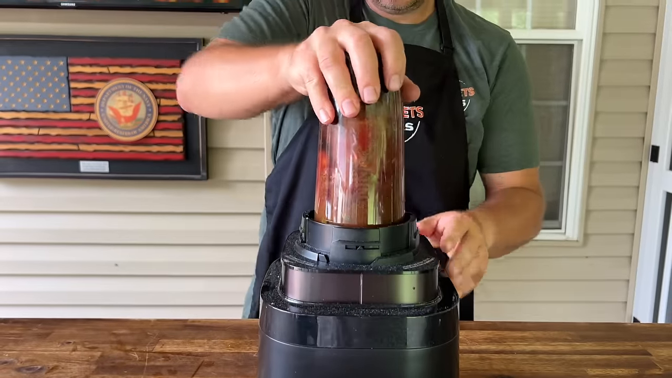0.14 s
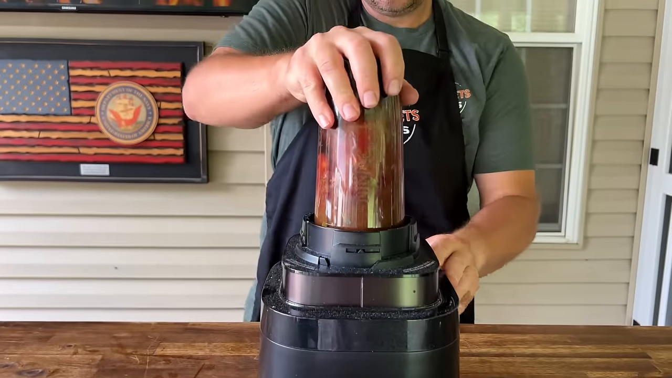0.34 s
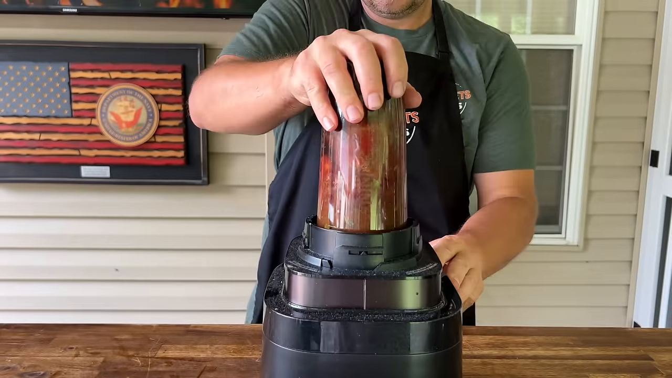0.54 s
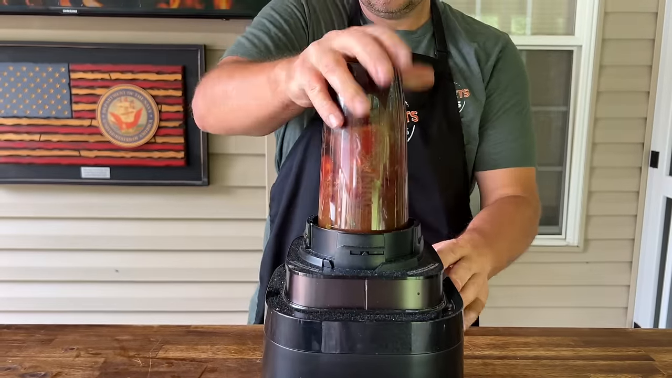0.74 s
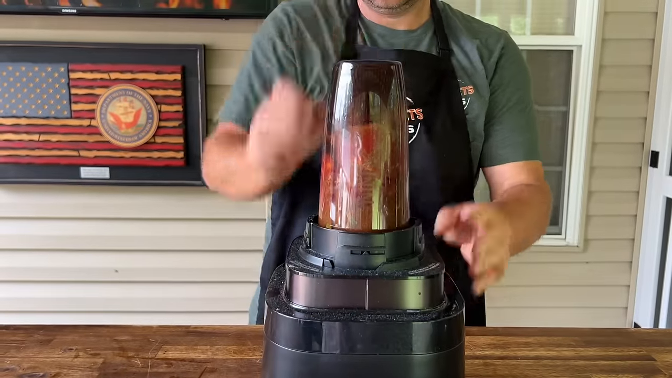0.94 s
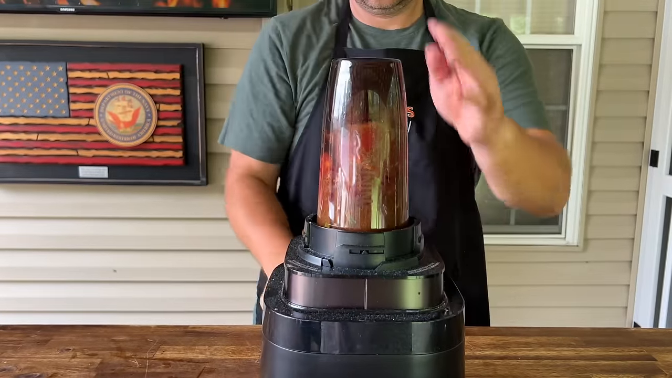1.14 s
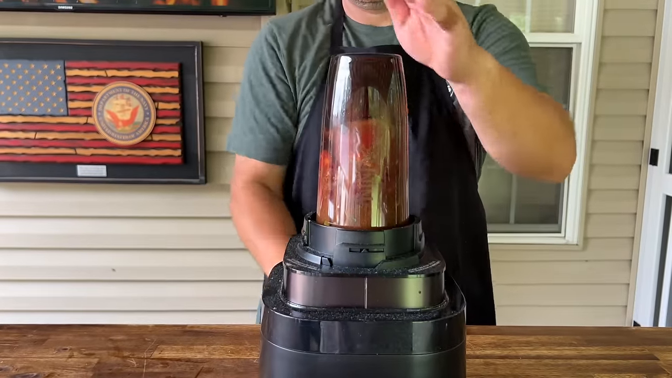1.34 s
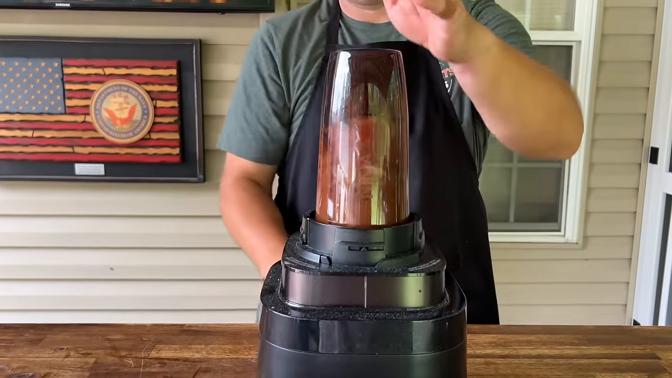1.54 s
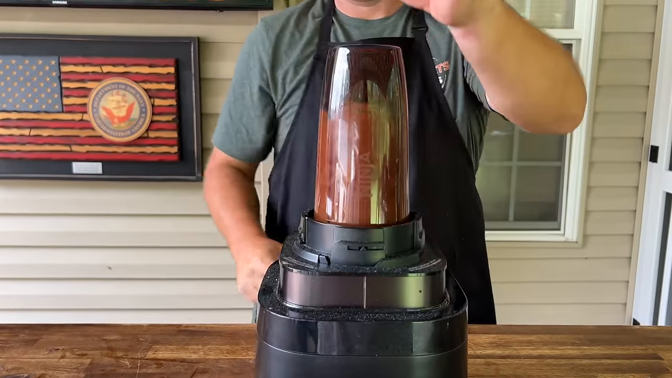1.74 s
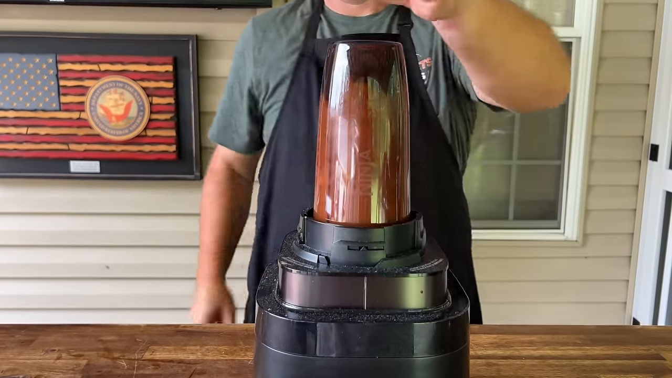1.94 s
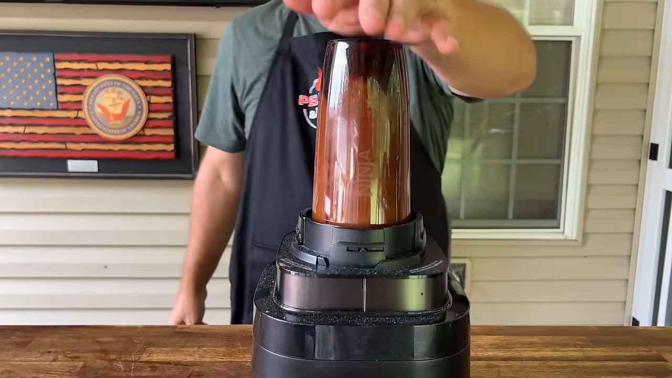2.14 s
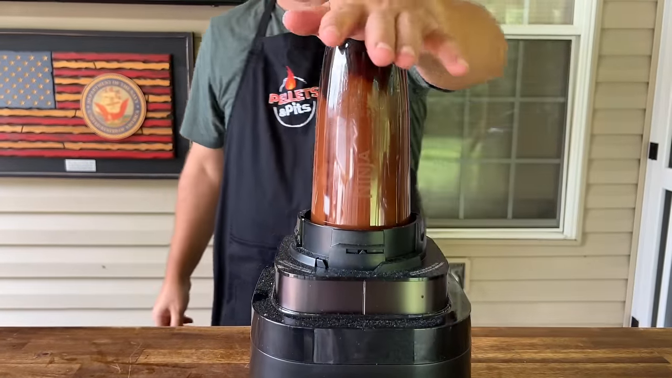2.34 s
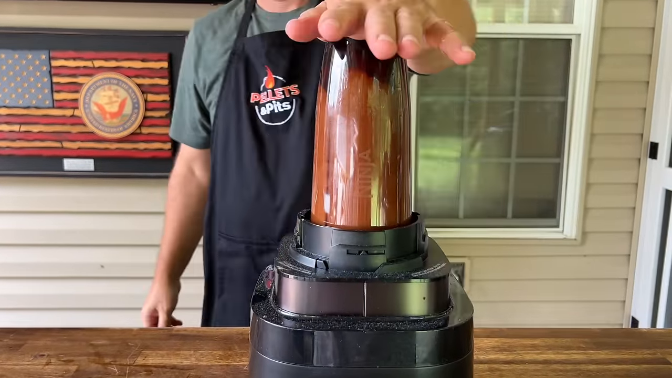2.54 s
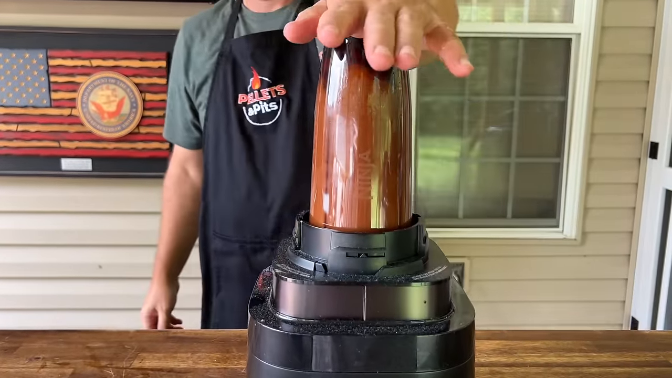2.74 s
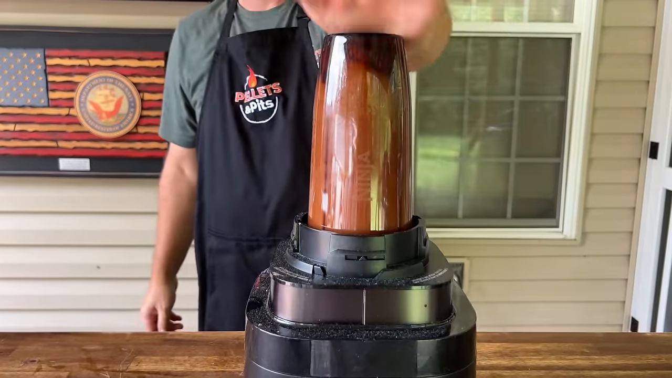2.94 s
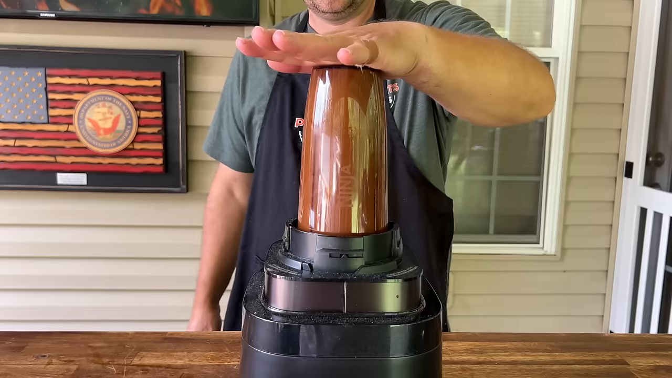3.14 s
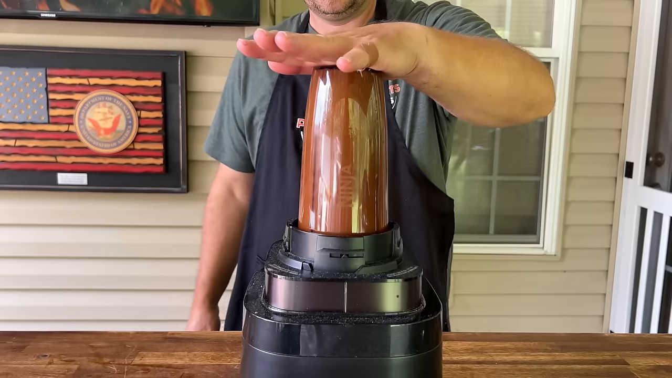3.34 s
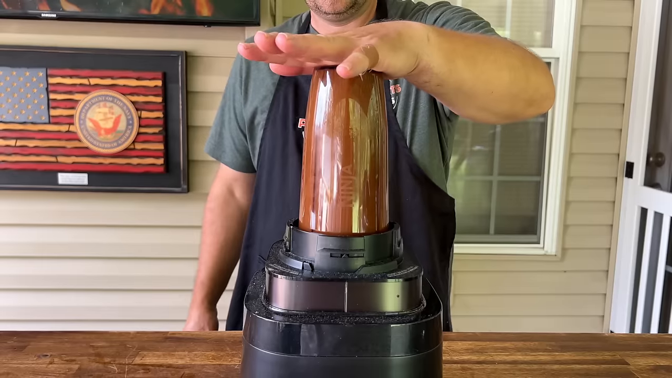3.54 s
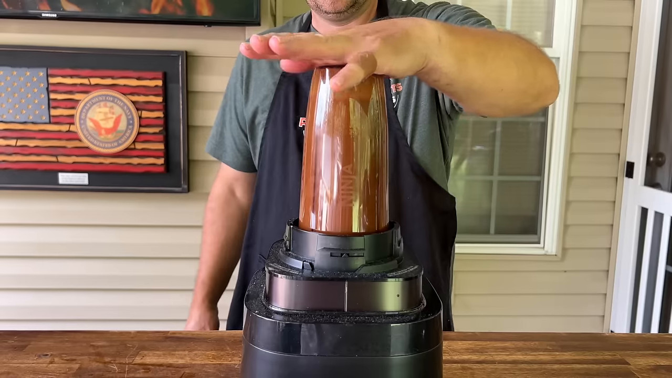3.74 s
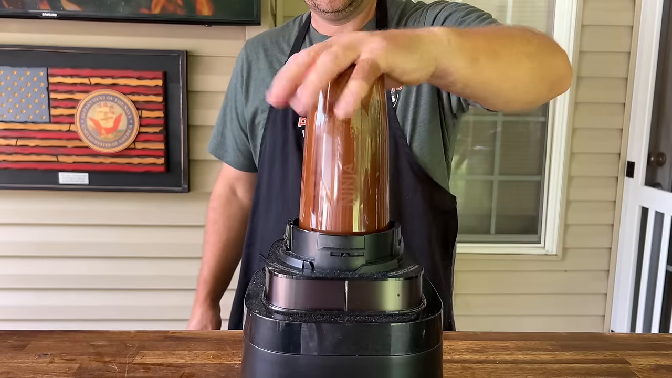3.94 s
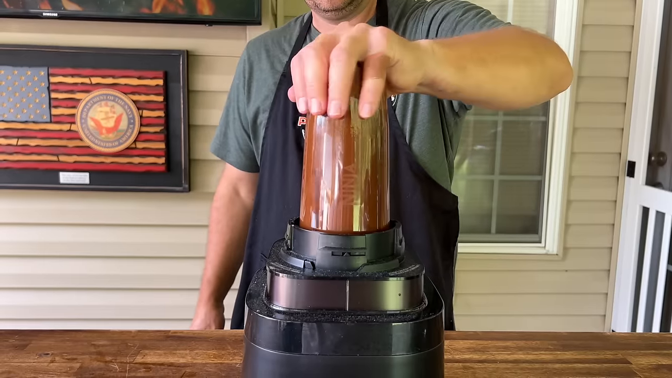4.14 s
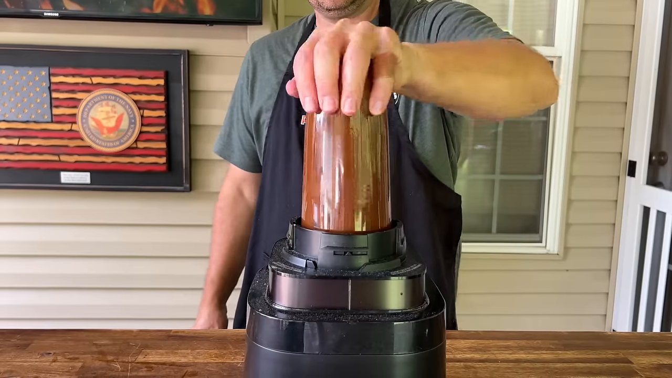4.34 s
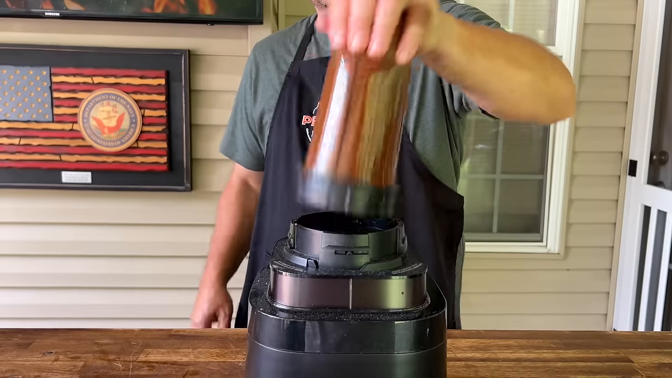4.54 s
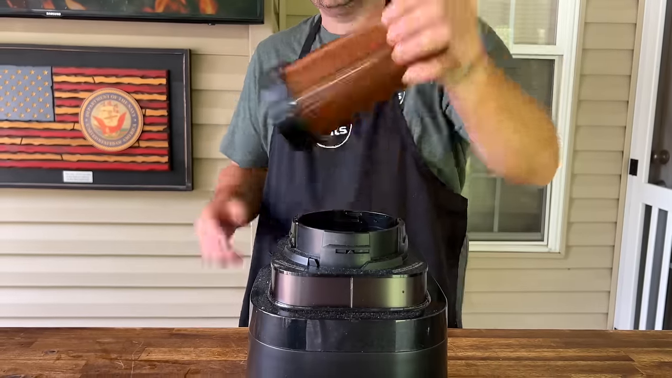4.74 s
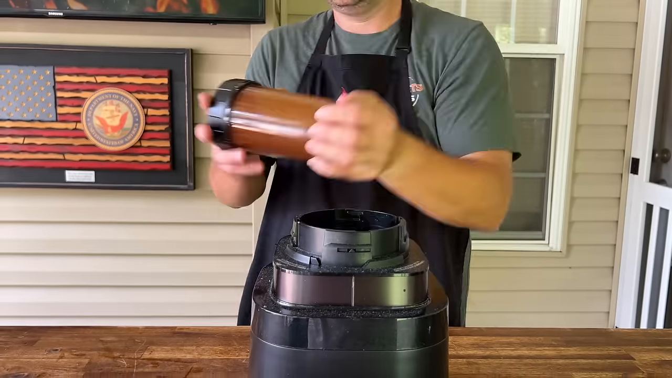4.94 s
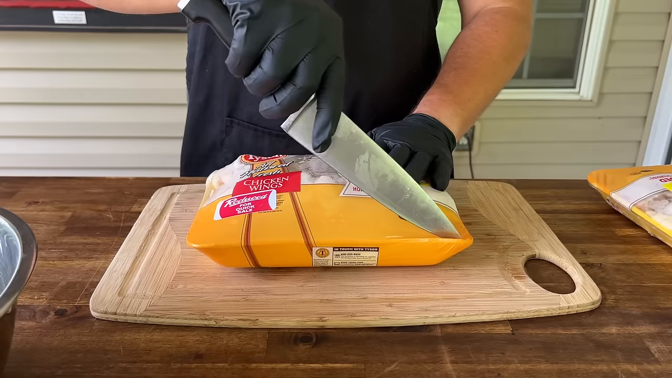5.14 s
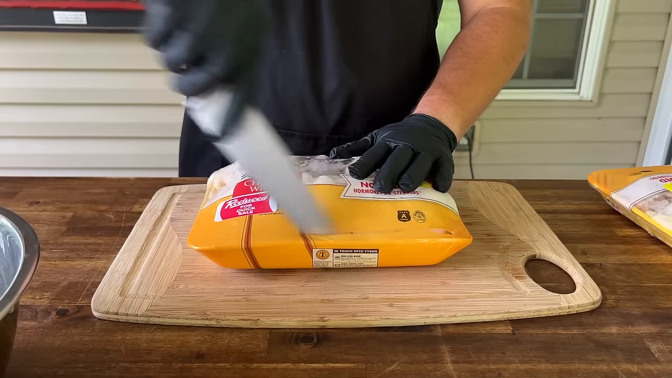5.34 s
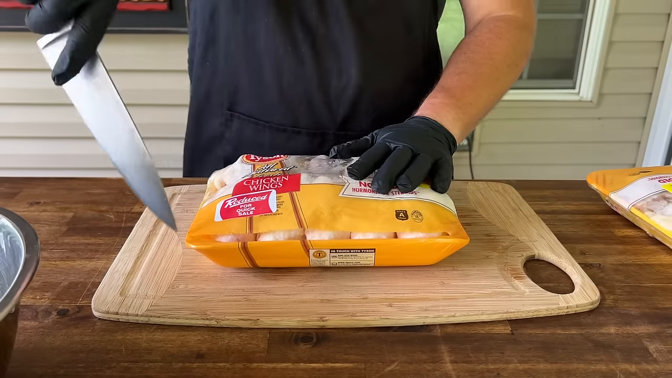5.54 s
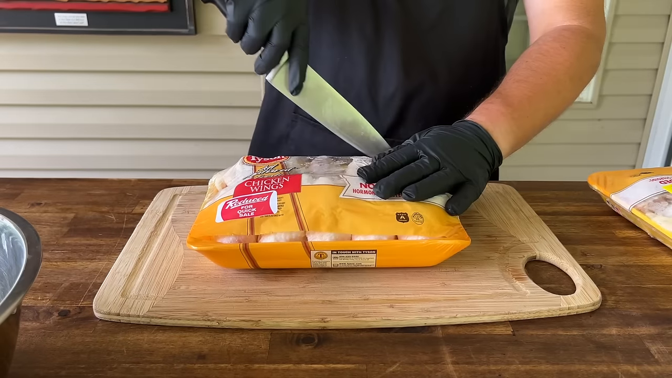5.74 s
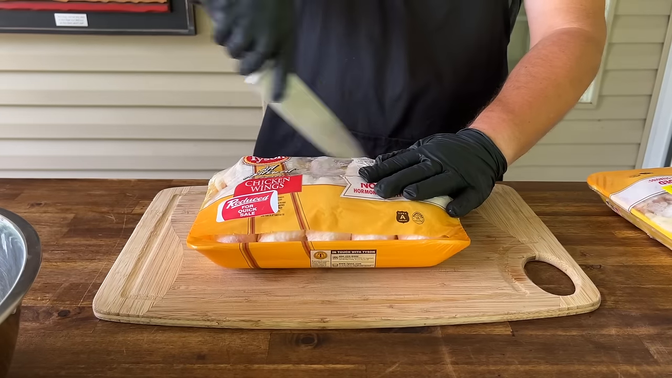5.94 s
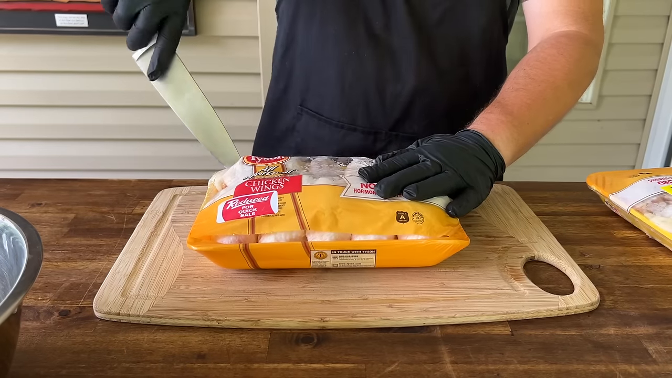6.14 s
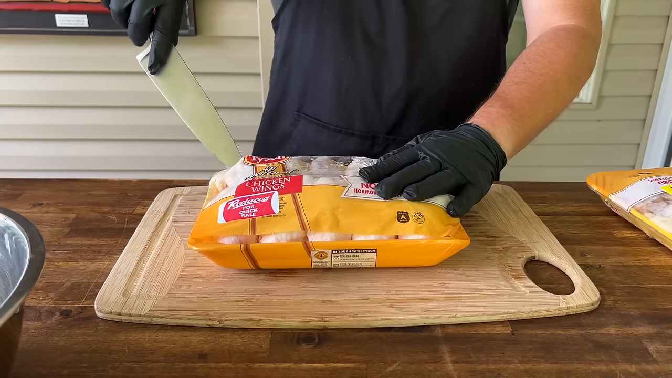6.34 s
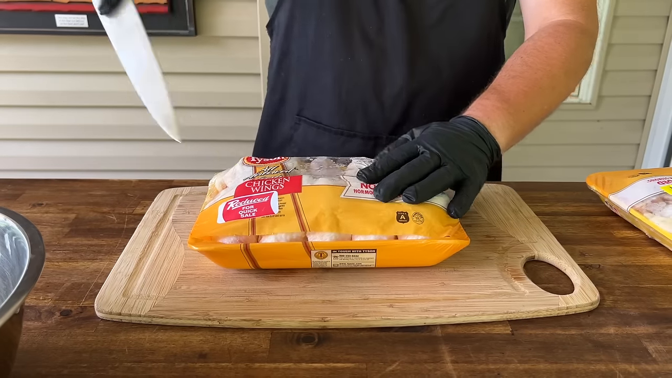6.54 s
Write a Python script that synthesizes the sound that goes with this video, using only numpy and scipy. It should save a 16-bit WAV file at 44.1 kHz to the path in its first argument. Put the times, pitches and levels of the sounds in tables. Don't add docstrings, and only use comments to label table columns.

```python
import sys
import numpy as np
from scipy import signal
from scipy.fft import rfft, irfft
from scipy.io import wavfile
from scipy.ndimage import uniform_filter1d

SR = 44100
rng = np.random.default_rng(int(sys.argv[2]) if len(sys.argv) > 2 else 0)


def int16_out(signal):
    q = np.round(np.clip(np.atleast_2d(signal).T, -1, 1) * 32767)
    wavfile.write(sys.argv[1], SR, q.astype(np.int16))


def natural_amplitude(level_db):
    exponent = np.asarray(level_db, float) / 20
    return 10 ** exponent


N = 291060
TIME = np.arange(N) / SR

# time_s, turns_hz
SHAFT_SPEED = [(1.39, 24.76), (1.7, 54.07), (2.17, 158), (2.25, 174), (2.31, 183.5), (2.37, 189.5),
               (2.43, 195.5), (2.49, 198.8), (2.56, 200.3), (2.67, 200), (2.79, 198.3), (2.9, 197.2),
               (3.078, 195)]
# time_s, drone_db
SAUCE_LOAD = [(1.39, -72), (1.398, -38.5), (1.46, -37), (1.6, -39.5), (1.774, -27), (2.042, -21.5),
              (2.4, -16), (2.836, -15), (3.078, -15.5)]
START_S, CUT_S, STOP_S = 1.39, 3.078, 3.95
COAST_HZ, COAST_TAU_S, FRICTION_HZ = 141.2, 0.58, 25.93
COAST_DB, COAST_DB_PER_OCTAVE, FULL_DB = -28, 12, -15
STALL_HZ, STALL_DB_PER_OCTAVE = 42.7, 1.5
# level_db above the loudest drone, slope in dB per dB of drone
DRONE_LAYERS = [
    [(2, 0.27), (-11.5, -0.32), (-17, -1.08), (-12.5, 0.3), (-18, 1.3), (-20.5, -1)],
    [(-1.5, 0), (-3, -0.26), (-10.5, -1.28), (-20, 0), (-19, 6), (-9.5, -0.4)],
]
# frequency_hz, density_db
ROAR_SPECTRUM = [(90, -14.5), (140, -13), (200, -10.5), (320, -8.5), (500, -5), (700, -7.5), (1260, -5.5),
                 (1520, -13), (2090, -9.5), (2750, -15.5), (3400, -7), (5600, -22.5), (8600, -26.5),
                 (9600, -31), (15700, -35.5)]
# frequency_hz, width_hz, gain_db
HOUSING_MODES = [(548, 34, 3), (654, 55, 5.5), (786, 90, 6), (1190, 120, -1.5), (1790, 39, 8.5),
                 (2120, 120, 2), (2373, 59, 5), (3470, 310, -9), (4300, 250, -1), (5450, 200, 3),
                 (7900, 1000, 3)]
# multiple, peak_db, peak_s, sag_db half a second away, start_s
SHAFT_HUM = [
    (1, -18, 2.64, -9.5, 2.2),
    (2, -23, 2.8, -4, 2.42),
    (3, -22.5, 2.76, -9, 2.43),
]
HUM_RISE_S, HUM_SLIP_S, HUM_SLIP_DB = .05, 2.91, -3
TOP_FROM_S, TOP_DB = 1.72, -50.5
# frequency_hz, width_hz, gain_db
COUPLING_MODES = [
    [(2060, 290, 5), (3400, 500, 9), (4660, 450, 11), (4100, 600, 6), (7900, 500, 6), (8750, 300, 7)],
    [(1900, 500, 11.5), (3420, 400, 22), (4640, 450, 14), (7900, 500, 10), (4200, 500, 5), (8700, 300, 16)],
    [(1900, 600, 13.5), (3400, 560, 18), (2700, 500, 6), (4100, 500, 6), (4680, 350, 13.5), (5450, 300, 6),
     (8000, 900, 5.5)],
]
# frequency_hz, width_hz, gain_db
CUP_MODES = [
    [(248, 70, 19), (702, 380, 12)],
    [(257, 110, 16.5), (699, 150, 8.5), (1000, 360, 14)],
    [(257, 110, 16.5), (770, 150, 8.5), (1180, 280, 17)],
]
KNOCKING_HZ = 55
SEATED_S, SEATING_S = 1.83, .08
SETTLED_S, SETTLING_S = 3.37, .3
LOOSE_HZ, LOOSE_OCTAVES, LOOSE_DB = 130, 0.37, 5.5
FREE_HZ, FREE_DB_PER_OCTAVE = 62.6, 15
# start_s, peak_db, ring_hz
SHAFT_KNOCKS = [(1.3963, -32, 2080), (1.4163, -25, 2060), (1.4412, -30, 3320), (1.4602, -24, 2010),
                (1.487, -31, 4100), (1.5644, -34, 2310), (1.519, -34, 3200), (1.545, -38, 4200),
                (1.5789, -31, 4350), (1.6038, -33, 4500), (1.6457, -27, 2050), (1.6682, -27, 2440),
                (1.818, -22, 3300), (1.903, -23, 3400), (3.5032, -34, 3440), (3.527, -36, 3400),
                (3.5677, -40, 3150), (3.607, -39, 4600), (3.6306, -39, 3210), (3.652, -41, 3030),
                (3.6785, -40, 3290), (3.7114, -44, 3210), (3.7393, -40.5, 3180), (3.7767, -47, 3230),
                (3.8241, -43, 3520), (3.8855, -54, 2770), (3.9089, -52, 2500)]
# start_s, peak_db, pitch_hz, decay_cycles
PART_RINGS = [
    [(.0575, -9.5, 4460, 7.2), (.0605, -11.5, 313, 4.5), (.84, -57, 2030, 80), (1.2138, -32, 1570, 9.8),
     (1.214, -30, 807, 6), (1.2045, -47, 11000, 2.5), (4.0765, -44.5, 4700, 12), (4.1235, -21, 4340, 8),
     (4.078, -37, 500, 4.4), (4.1098, -18.5, 1580, 10), (4.1098, -23, 2150, 12), (4.1092, -19, 570, 4),
     (4.445, -45, 2600, 6), (4.472, -46, 3000, 6)],
    [(1.4103, -42, 7000, 4), (1.4337, -40, 6500, 4), (1.4602, -40, 12000, 3), (1.468, -41, 11000, 3),
     (1.503, -44, 12900, 3), (1.541, -42, 12500, 3), (1.617, -44, 12000, 3), (1.643, -42, 12000, 3),
     (1.545, -47, 8750, 26), (1.5809, -43, 8700, 40), (1.58, -27, 4600, 20), (1.6018, -41, 8780, 30),
     (1.6263, -40, 5400, 8), (1.6672, -34, 6000, 4), (1.6931, -34, 5220, 8)],
    [(3.4103, -31, 1010, 5), (3.4397, -23, 1090, 5.7), (3.4752, -36, 1160, 5), (3.4886, -25, 1020, 5.9),
     (3.5126, -38, 1230, 5), (3.537, -35, 1150, 5), (3.561, -31, 1180, 8), (3.6074, -34, 1140, 6),
     (3.6453, -32, 1210, 4.7), (3.6757, -42, 1050, 5), (3.7396, -47, 1020, 5)],
]

# start_s, crack_db, body_db, sizzle_db, body_pitch_hz
CUP_KNOCKS = [(0.0064, -20, -27.5, -22.5, 375), (0.016, -40, -34, -27.5, 257),
              (0.0574, -14.5, -14, -11.5, 349), (0.398, -30, -53, -56, 186), (0.597, -31, -42, -71, 216),
              (1.2117, -23.5, -26, -50, 206), (1.3183, -27.5, -29.5, -66, 200), (1.374, -33, -40, -43, 208),
              (1.393, -37, -30, -65, 242), (4.1103, -16, -33, -10.5, 355), (4.1239, -27, -30, -26, 356),
              (4.1278, -30, -32, -24.5, 347), (4.1696, -19.5, -24.5, -46, 335), (4.179, -26, -32, -47, 379),
              (4.1876, -43, -36, -51, 334), (4.198, -48, -46, -56, 298), (4.4161, -43.5, -40, -59, 246),
              (4.4452, -50, -51, -57, 292), (4.466, -44, -57, -44.5, 204)]
# multiple of body pitch, level_db, t60_s
BODY_MODES = [(0.682, -6, 0.092), (1.0, 4, 0.05), (1.548, -3, 0.052), (2.2, -5.5, 0.048),
              (2.898, -11, 0.059)]
# frequency_hz, level_db, t60_s
SHELL_MODES = [(1210, 3, 0.077), (1576, 6, 0.0425), (2157, -2, 0.047), (2840, 0, 0.062), (3080, -21, 0.016),
               (4300, -1.5, .04), (4350, -4, 0.04)]
KNOCK_T60_S = 0.045

# start_s, length_s, level_db, brightness_db, growth_db
TEAR_RUNS = [
    [(4.075, 0.013, -51, -7.5, -11.5), (4.131, 0.04, -46.5, -5, -5.5), (4.204, .05, -58, -9, 0),
     (4.414, 0.025, -56, -3.5, -10), (4.438, .04, -54, -3, 2)],
    [(5.229, .012, -38, 1, -5), (5.239, 0.018, -26.5, 4, 3), (5.262, 0.043, -42.5, 1.5, 6.5),
     (5.297, 0.016, -25, 0, -5), (5.32, 0.012, -31.5, 2.5, -11), (5.331, 0.035, -23, 0, -0.5),
     (5.367, 0.024, -31, 1, -8.5), (5.391, 0.0062, -20.5, 2.5, -2), (5.397, 0.045, -40, 5.5, -6),
     (5.44, 0.047, -46, 10, -9)],
    [(5.8985, 0.021, -31, 3, -6.5), (5.921, 0.017, -36.5, 5, -4), (5.94, .03, -36, 6.5, -1),
     (5.97, 0.033, -36, 10, -2.5), (6.0, .024, -35, 2.5, -1), (6.024, 0.0255, -36, 5, -9.5)],
    [(6.05, 0.074, -49, 5, -15), (6.217, 0.072, -52.5, 12, -19)],
    [(5.198, 0.045, -43.5, -5.5, -2), (6.326, 0.039, -53, 5.5, -2), (6.366, .04, -54.5, 7, -13)],
]
# boom_db, rise_s, blade_edge_db, crackle_db, taut_film_db, release_s
TEAR_COLOURS = [
    (4, 0.00464, -28, -1.5, -39, .002),
    (-11, 0.0077, -29, -2.5, -13.5, .0014),
    (-24, 0.0036, -26, -7, -4, .004),
    (-30, .003, -7, -1, -30, .004),
    (-30, 0.021, -1.5, -0.5, -31, .012),
]
# start_s, peak_db, centre_hz, sizzle_db, decay_cycles
FILM_SNAPS = [(5.228, 5, 4430, -3, 2.4), (5.2382, -14, 5460, -17, 2.9), (5.3163, -10, 3500, -20, 1.4),
              (5.3163, -12, 1000, -40, 1), (5.3445, -21, 1000, -30, 0.91), (5.3485, -17, 1200, -29, 0.87),
              (5.354, -14, 2500, -25, 1.5), (5.3615, -12.5, 900, -25, 1), (5.899, -18, 2500, -30, 1.5),
              (5.8877, -2, 2520, -20.5, 2.5), (5.8911, -3.5, 2700, -16, 1.5),
              (6.0438, -20, 4040, -18.5, 1.5), (6.15, -38, 4000, -36, 2.5), (6.1852, -46, 4000, -46, 3.0),
              (6.2153, -17, 3980, -9, 2.7), (5.2285, -19, 354, -58.5, 1.5), (5.888, -23.5, 670, -59, 2.7),
              (6.2156, -32, 1650, -59, 4.8), (6.2158, -33, 4000, -60, 12), (.295, -70, 9000, -53, 1.6),
              (4.92, -71, 9000, -51.5, 1.4), (3.9092, -70, 8000, -48, 1.5), (5.3, -19, 3000, -24.5, 2.2),
              (6.5403, -71, 8000, -52, 1.5), (6.5736, -53.5, 3000, -48, 2.5)]
# frequency_hz, density_db
FILM_SPECTRUM = [(180, -44.5), (300, -7), (366, -3.5), (756, -9), (863, -6.5), (1000, -10), (1810, -2.5),
                 (1970, -5), (2610, -4.5), (3870, -3.5), (7250, -16), (8140, -13.5), (15500, -19.5)]
# frequency_hz, width_hz, level_db, drift_db_per_s
SLIT_RINGS = [(1590, 320, -2, 38), (2105, 500, -5, -70), (3000, 500, -8, 0), (3720, 450, -4.5, 40),
              (4600, 450, -7.5, -0.5), (6000, 600, -15, 1)]
SLIT_MID_S = 5.97

PORCH_T60_S, PORCH_DB, FILM_PORCH_DB = 0.18, -15, -16.5

# peak_s, half_width_s, flutter_db, buffet_db
WIND_GUSTS = [(.06, 0.044, -24.5, -19), (.33, 0.037, -50, -18), (.5, 0.043, -20, -1.5),
              (.61, 0.04, -13, -7), (.81, 0.071, -30.5, -11.5), (1.03, 0.054, -16, -47),
              (1.17, 0.022, -11, -4), (1.29, 0.033, -10.5, -1), (1.45, 0.091, -30, -3),
              (1.6, 0.2, -18, -11.5), (1.92, 0.075, -14.5, -11), (2.44, 0.088, -22, -11),
              (2.7, 0.099, -26, -7), (3.02, 0.13, -25, -11.5), (3.14, 0.061, -25, -21),
              (3.4, 0.078, -45, -11), (3.72, 0.1, -30, -17), (3.92, 0.06, -26, -12),
              (4.36, 0.041, -30, -14), (4.6, 0.1, -27, -10.5), (4.74, 0.089, -21.5, -18),
              (4.91, 0.091, -25, -25), (5.26, 0.055, -27.5, -26.5), (5.42, 0.037, -29, -12.5),
              (5.62, 0.064, -18.5, -15), (5.73, 0.037, -16, -6.5), (6.18, 0.051, -25, -15),
              (6.37, 0.14, -25, -18.5), (6.6, 0.034, -23.5, -26)]
# frequency_hz, density_db
BUFFET_SPECTRUM = [(1.5, 17.5), (4, 11), (9, 21.5), (15, 14.5), (22, 11), (40, -67)]
# frequency_hz, density_db
FLUTTER_SPECTRUM = [(12, -10), (22, -4.5), (35, -7.5), (60, -14.5), (110, -29), (200, -46), (400, -93.5)]
# start_s, step as a fraction of full scale
PRESSURE_STEPS = [
    (5.0137, -0.061),
    (5.7807, -.22),
]
CALM_FLUTTER_DB, CALM_BUFFET_DB, WIND_TOP_HZ, GRILLE_LIMIT = -36, -22, 4970, .72

# frequency_hz, density_db
YARD_SPECTRUM = [(130, -3), (230, 0), (330, -4), (500, -8.5), (820, -8.5), (1100, -14.5), (2060, -19.5),
                 (2900, -23), (5300, -27.5), (6300, -37.5), (7500, -21.5), (8400, -40), (15500, -63)]
# peak_s, half_width_s, low_chorus_db, high_chorus_db
INSECT_SWELLS = [(.15, 0.12, -58.5, -51.5), (.95, 0.28, -60, -50.5), (4.64, 0.13, -63.5, -53.5),
                 (5.1, .1, -63, -52), (5.5, 0.086, -57, -69.5), (5.92, 0.13, -57, -57),
                 (6.6, 0.17, -68, -54)]
CHORUS_LOW_DB, CHORUS_HIGH_DB = -70, -68.5
YARD_DB, DIP_START_S, DIP_END_S, DIP_DB = -52, 4.52, 5.01, -1.5
SELF_NOISE_DB = -74.5


def blender():
    hz = speed()
    turn = 2 * np.pi * np.cumsum(hz * (1 + 0.0005 * walk(30))) / SR
    lumps = natural_amplitude(1.5 * np.clip((1.9 - TIME) / .5, 0, 1) * walk(60))
    pulse = (1 + 0.091 * np.cos(turn)) * lumps
    bands_hz = ((0, 1400), (1400, 5600), (5600, 9000), (9000, 3e4))
    cup, blade, air, top = (hiss(ROAR_SPECTRUM, lo, hi, HOUSING_MODES) for lo, hi in bands_hz)
    rumble = hiss([(120, -6), (240, 0.5), (340, -5.5)], 120, 340)
    rattles, bells = chatter(hz)
    out = shaft_hum(turn) + pings(PART_RINGS[1] + PART_RINGS[2]) + shaft_knocks(rattles)

    loose = natural_amplitude(LOOSE_DB * (TIME < CUT_S) * np.exp(-(np.log2(hz / LOOSE_HZ) / LOOSE_OCTAVES) ** 2))
    loose = loose * natural_amplitude(FREE_DB_PER_OCTAVE * (TIME > CUT_S) * np.log2(np.minimum(hz / FREE_HZ, 1)))
    driven_db = np.interp(TIME, *np.transpose(SAUCE_LOAD))
    coast_db = COAST_DB + COAST_DB_PER_OCTAVE * np.log2(hz / COAST_HZ)
    coast_db = coast_db + STALL_DB_PER_OCTAVE * np.log2(np.minimum(hz / STALL_HZ, 1))
    driven = driven_db, FULL_DB, (TIME > START_S) & (TIME < CUT_S)
    coasting = coast_db, COAST_DB, (TIME >= CUT_S) & (TIME < STOP_S)
    top_on = np.clip((TIME - TOP_FROM_S) / 0.024, 0, 1) * (TIME < CUT_S)
    for (drone_db, loudest_db, on), layers, bell, rattle in zip((driven, coasting), DRONE_LAYERS, bells, rattles):
        gains = [natural_amplitude(np.minimum(db + slope * (drone_db - loudest_db), 3.5)) for db, slope in layers]
        blade_gain, rattle_gain, bell_gain, air_gain, top_gain, rumble_gain = gains
        top_gain = np.hypot(top_gain, natural_amplitude(TOP_DB - drone_db) * top_on)
        wash = natural_amplitude(0.56 * walk(14)) * cup + blade_gain * natural_amplitude(0.68 * walk(15)) * blade
        wash = wash + air_gain * air + top_gain * top + rumble_gain * rumble
        shell = rattle_gain * loose * natural_amplitude(1.5 * walk(35)) * rattle
        ringing = bell_gain * natural_amplitude(1.5 * walk(30)) * bell
        out = out + on * natural_amplitude(drone_db) * (pulse * wash + shell + ringing)
    return out


def speed():
    coast = (COAST_HZ + FRICTION_HZ) * np.exp(-(TIME - CUT_S) / COAST_TAU_S) - FRICTION_HZ
    return np.where(TIME < CUT_S, np.interp(TIME, *np.transpose(SHAFT_SPEED)), np.maximum(coast, 2))


def shaft_hum(turn):
    out = np.zeros(N)
    slip_db = HUM_SLIP_DB * np.clip((TIME - HUM_SLIP_S) / 0.049, 0, 1)
    for k, peak_db, peak_s, sag_db, start_s in SHAFT_HUM:
        level_db = peak_db + sag_db * (2 * (TIME - peak_s)) ** 2 + (0.3 + .45 * k) * walk(25)
        level_db = level_db + slip_db * (k % 2)
        rise = np.clip((TIME - start_s) / HUM_RISE_S, 0, 1)
        out += np.sqrt(2) * natural_amplitude(level_db) * rise * np.sin(k * turn)
    return out * (TIME < CUT_S)


def chatter(hz):
    phase = np.cumsum(hz * (1 + .15 * walk(40))) / SR
    size = natural_amplitude(1.8 * rng.standard_normal(2000))[phase.astype(int)]
    knock = size * np.clip(hz / KNOCKING_HZ - 1, .15, 1) * np.exp(-(phase % 1) / hz / .003)
    scrape = .55 * np.sqrt(size) * np.clip(hz / KNOCKING_HZ, .45, 1)
    blows = rng.standard_normal(N) * (knock + scrape)
    cup_points = [(100, -18.5), (200, 1.0), (1500, 2.5), (2500, -34.0)]
    shell_points = [(900, -21.0), (1500, 0.0), (6000, -9), (8900, -18), (10000, -26.5)]
    churning, draining, still = (hiss(cup_points, peaks=peaks, x=blows) for peaks in CUP_MODES)
    slow, fast, free = (hiss(shell_points, peaks=peaks, x=blows) for peaks in COUPLING_MODES)
    settled = np.clip((TIME - SETTLED_S) / SETTLING_S + .5, 0, 1) ** 2
    seated = np.clip((TIME - SEATED_S) / SEATING_S + .5, 0, 1)
    driven_rattle = natural_amplitude(-1.0) * (1 - seated) * slow + seated * fast
    return (driven_rattle, free), (churning, (1 - settled) * draining + settled * still)


def shaft_knocks(rattles):
    out, t = np.zeros(N), TIME[:SR // 20]
    for s, db, hz in SHAFT_KNOCKS:
        i, shell = int(s * SR), rattles[int(s > CUT_S)]
        tones = .6 * np.sin(2 * np.pi * hz * t) + .3 * np.sin(2 * np.pi * 4680 * t)
        env = np.exp(-t / .0045) * (1 - np.exp(-t / .0006))
        add(out, s, natural_amplitude(db) * (tones + .65 * shell[i:i + len(t)]) * env)
    return out


def pings(rows):
    out, t = np.zeros(N), TIME[:SR // 20]
    for s, db, hz, cycles in rows:
        env = np.exp(-t * hz / max(cycles, .5)) * (1 - np.exp(-t * hz / 1.5))
        add(out, s, natural_amplitude(db) * np.sin(2 * np.pi * hz * t) * env)
    return out


def film():
    grit = rng.standard_normal(N) * natural_amplitude(2.5 * np.minimum(rng.exponential(size=N), 6))
    dull, bright = hiss(FILM_SPECTRUM, 600, 6000, x=grit), hiss(FILM_SPECTRUM, 6000, x=grit)
    tray = hiss([(100, 3.5), (200, 6.0), (450, 11.0), (900, -22.0)], 120, 1180, x=grit)
    edge = hiss([(3000, -14), (4500, 7), (5600, -13.5)], 2720, 6000, x=grit)
    taut = np.zeros(N)
    for hz, width, db, drift in SLIT_RINGS:
        drift_db = np.clip(drift * (TIME - SLIT_MID_S), -6, 6)
        band = hiss([(100, 0), (200, 0)], hz - width / 2, hz + width / 2, x=grit)
        taut += natural_amplitude(db + drift_db + 3.5 * walk(70)) * band

    out, t = np.zeros(N), TIME[:SR // 40]
    for rows, (tray_db, rise_s, edge_db, dull_db, taut_db, release_s) in zip(TEAR_RUNS, TEAR_COLOURS):
        body = natural_amplitude(dull_db) * dull + natural_amplitude(taut_db) * taut + natural_amplitude(tray_db) * tray + natural_amplitude(edge_db) * edge
        for s, length, db, bright_db, growth_db in rows:
            rise = np.clip((TIME - s) / rise_s, 0, 1)
            env = rise * np.exp(-np.maximum(TIME - s - length, 0) / release_s)
            level_db = db + growth_db * np.clip((TIME - s) / length, 0, 1)
            out += natural_amplitude(level_db) * env * (body + natural_amplitude(bright_db - 3.5) * bright)
    out *= natural_amplitude(0.83 * walk(120))
    for s, db, hz, sizzle_db, cycles in FILM_SNAPS:
        i = slice(int(s * SR), int(s * SR) + len(t))
        pop = np.sin(2 * np.pi * hz * t) * np.exp(-t * hz / max(cycles, .3)) * (1 - np.exp(-t * hz * 3))
        pop = np.gradient(pop) * SR / (2 * np.pi * hz)
        pop = pop + 0.2 * dull[i] * np.exp(-t / 0.0016)
        add(out, s, natural_amplitude(db) * pop + natural_amplitude(sizzle_db + 2.5) * bright[i] * np.exp(-t / 0.00039))
    return out


def knocks():
    out, t = np.zeros(N), TIME[:SR // 5]
    thud, dull = hiss(YARD_SPECTRUM, 180, 900), hiss(FILM_SPECTRUM, 900, 2600)
    sharp, tick = hiss(FILM_SPECTRUM, 2600, 5000), hiss(FILM_SPECTRUM, 5000)
    fade = 1000 ** (-t / KNOCK_T60_S)
    chances = rng.standard_normal((len(CUP_KNOCKS), 16))
    for (s, db, body_db, tick_db, hz), chance in zip(CUP_KNOCKS, chances):
        i = slice(int(s * SR), int(s * SR) + len(t))
        soft_db = np.clip(db - tick_db, 0, 30)
        rise = 1 - np.exp(-t / (.0001 + .00005 * soft_db))
        modes = [(f, g - 0.048 * soft_db * np.log2(f / 1500), t60) for f, g, t60 in SHELL_MODES]
        body = ring(np.array(BODY_MODES) * [hz, 1, 1], t, 1.11, chance) + .5 * thud[i] * fade
        shell = ring(modes, t, (25.5 - 0.29 * soft_db) * KNOCK_T60_S, chance[8:])
        crack = 0.5 * (dull[i] + natural_amplitude(4.0 - 0.5 * soft_db) * sharp[i]) * fade
        y = natural_amplitude(body_db + 13.0) * body * (1 - np.exp(-t / 0.0036))
        y += rise * natural_amplitude(db - 4.5) * (shell + crack)
        add(out, s, y + natural_amplitude(tick_db + 2.0) * tick[i] * fade ** 3.0)
    return out


def wind():
    flutter, buffet = swells(WIND_GUSTS, (CALM_FLUTTER_DB, CALM_BUFFET_DB))
    out = buffet * steady(hiss(BUFFET_SPECTRUM, 0, WIND_TOP_HZ), 0.72)
    out = out + flutter * steady(hiss(FLUTTER_SPECTRUM, 0, WIND_TOP_HZ), 0.04)
    out = GRILLE_LIMIT * np.tanh(out / GRILLE_LIMIT)
    t = TIME[:SR // 4]
    for s, size in PRESSURE_STEPS:
        add(out, s, size * np.exp(-t / .04))
    return out


def yard():
    dip = uniform_filter1d(1. * (TIME > DIP_START_S) * (TIME < DIP_END_S), size=2000)
    hum = hiss(YARD_SPECTRUM, 130, peaks=[(447.0, 18, 12.8), (740, 11, 7.6)])
    out = natural_amplitude(YARD_DB + DIP_DB * dip + walk(2.2)) * hum
    low = hiss([(3300, -6.5), (3900, 0), (4600, -3)], 3200, 4700)
    high = hiss([(4800, -1.0), (5400, 1), (6500, -10)], 4300, 7800)
    low_gain, high_gain = swells(INSECT_SWELLS, (CHORUS_LOW_DB, CHORUS_HIGH_DB))
    return out + natural_amplitude(-4.0) * low_gain * low + natural_amplitude(-8.5) * high_gain * high


def swells(rows, calm_db):
    gains = []
    for k, calm in enumerate(calm_db):
        power = natural_amplitude(calm) ** 2
        for row in rows:
            power = power + natural_amplitude(row[2 + k]) ** 2 * np.exp(-((TIME - row[0]) / max(row[1], .01)) ** 2)
        gains.append(np.sqrt(power))
    return gains


def ring(modes, t, stretch, chance):
    y = np.zeros(len(t))
    for (hz, db, t60), c in zip(modes, chance):
        tone = np.sin(2 * np.pi * hz * (1 + 0.044 * c) * t)
        y += natural_amplitude(db + 1.33 * c) * tone * 1000 ** (-t / (t60 * stretch))
    return y / np.max(np.abs(y))


def hiss(points, lo_hz=0, hi_hz=3e4, peaks=(), x=None):
    x = rng.standard_normal(N) if x is None else x
    f = np.maximum(np.arange(N // 2 + 1) * SR / N, .1)
    points_hz, points_db = np.transpose(points)
    db = np.interp(np.log(f), np.log(points_hz), points_db)
    db = db + sum(gain / (1 + (2 * (f - hz) / width) ** 2) for hz, width, gain in peaks)
    edge = 1 / np.sqrt((1 + (lo_hz / f) ** 12) * (1 + (f / hi_hz) ** 12))
    return unit(irfft(rfft(x) * natural_amplitude(db) * edge, N))


def walk(rate):
    k = int(SR / rate)
    steps = np.repeat(rng.standard_normal(N // k + 1), k)
    return unit(uniform_filter1d(uniform_filter1d(steps, k), k)[:N])


def steady(x, seconds):
    k = int(seconds * SR)
    return x / np.sqrt(uniform_filter1d(uniform_filter1d(x ** 2, k), k) + 0.19)


def unit(x):
    return x / np.sqrt(np.mean(x ** 2))


def add(out, s, y):
    i = int(s * SR)
    out[i:i + len(y)] += y[:N - i]


def scene():
    hits, tears = knocks() + pings(PART_RINGS[0]), film()
    t = TIME[:SR // 3]
    echo = rng.standard_normal(len(t)) * 1000 ** (-t / PORCH_T60_S) * (t > .004)
    echo = signal.lfilter([1], [1, -.45], echo)
    echo = echo / np.sqrt(np.sum(echo ** 2))
    wet = signal.fftconvolve(natural_amplitude(PORCH_DB) * hits + natural_amplitude(FILM_PORCH_DB) * tears, echo)[:N]
    return (hits + tears + wet + blender() + wind() + yard())[None]


def band_limit(x):
    return signal.sosfilt(signal.butter(12, 16550, fs=SR, output="sos"), x)


def record(dry):
    dry = dry + natural_amplitude(SELF_NOISE_DB) * rng.standard_normal(N)
    soft = dry / (1 + np.abs(dry) ** 30) ** (1 / 30)
    top = signal.ellip(8, .2, 46, 15700, fs=SR, output="sos")
    return band_limit(signal.sosfilt(top, soft))


dry = scene()
out = record(dry)
int16_out(out)
```